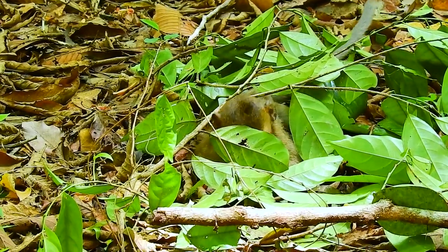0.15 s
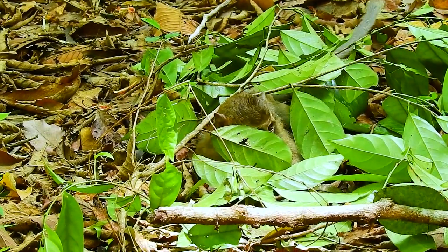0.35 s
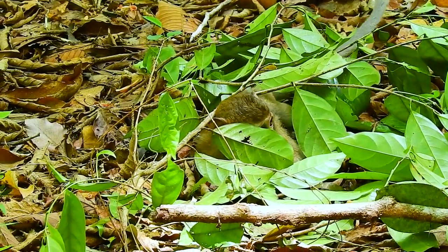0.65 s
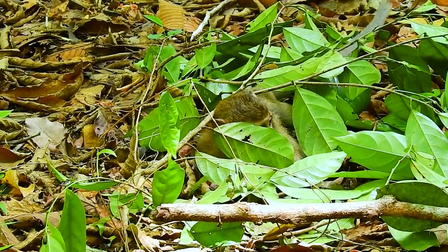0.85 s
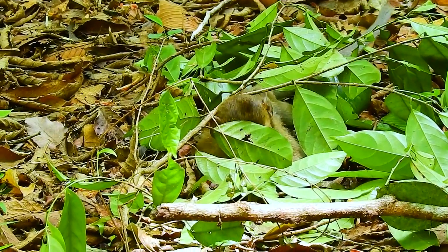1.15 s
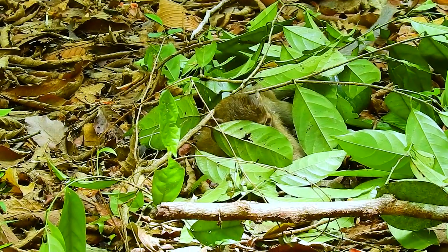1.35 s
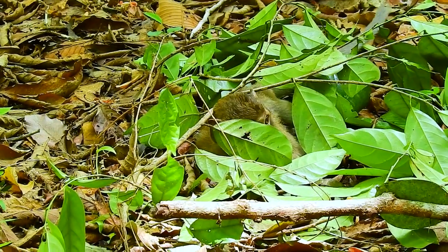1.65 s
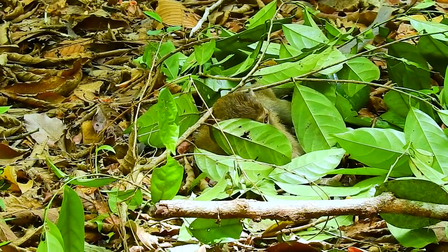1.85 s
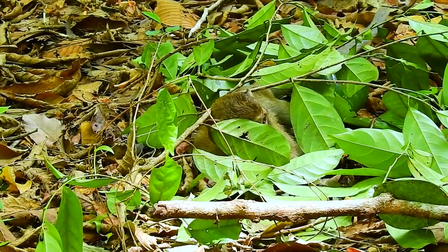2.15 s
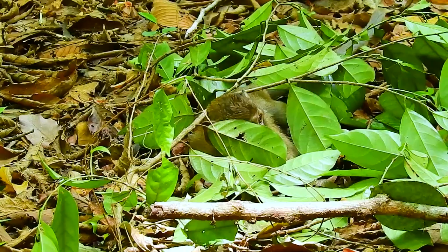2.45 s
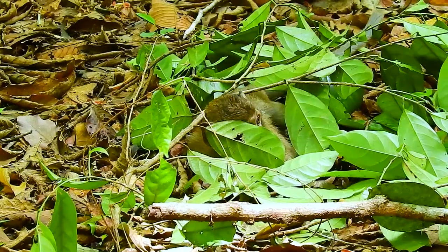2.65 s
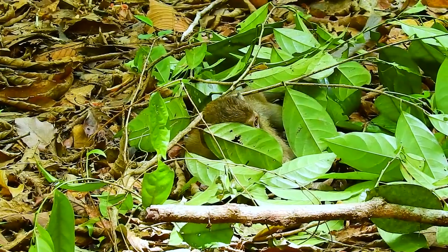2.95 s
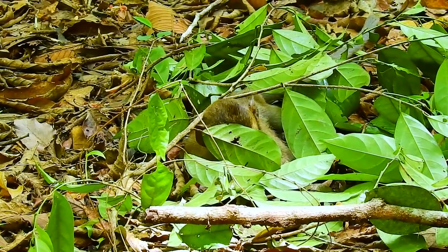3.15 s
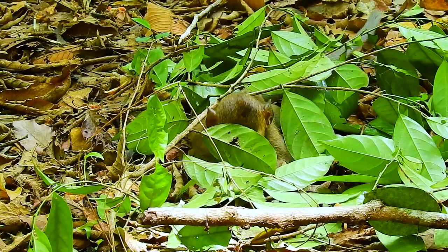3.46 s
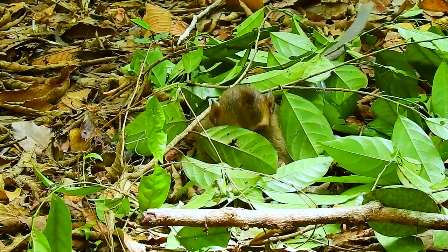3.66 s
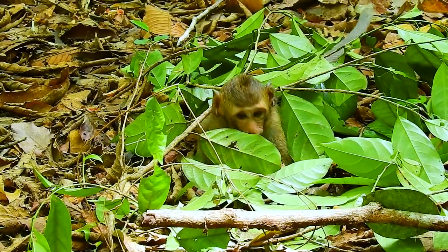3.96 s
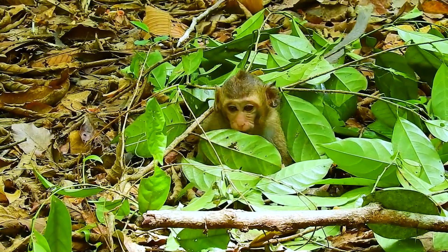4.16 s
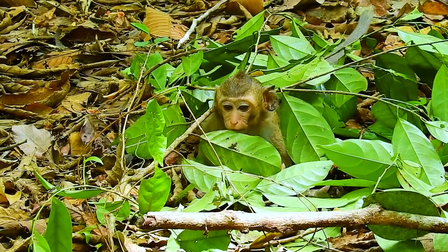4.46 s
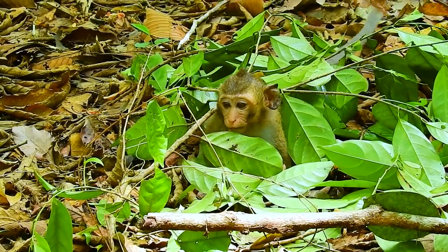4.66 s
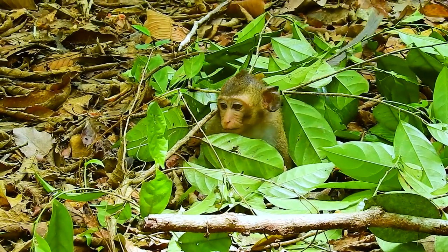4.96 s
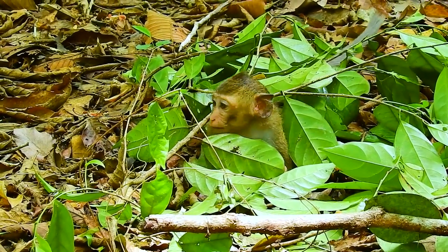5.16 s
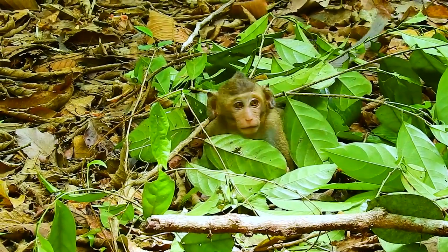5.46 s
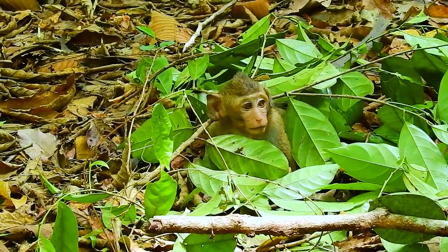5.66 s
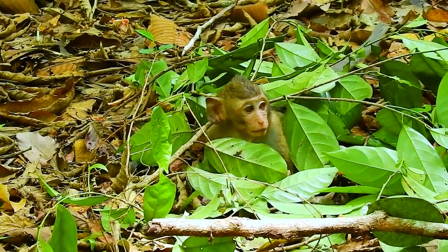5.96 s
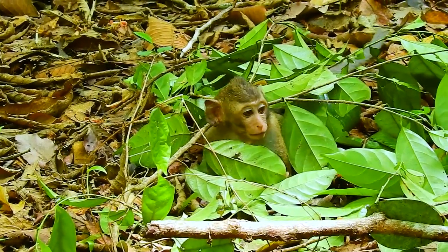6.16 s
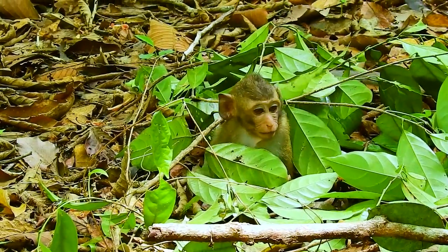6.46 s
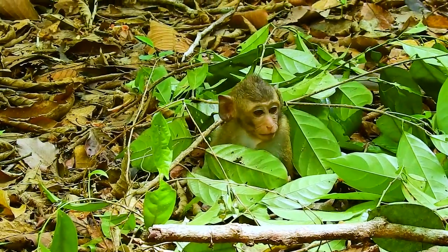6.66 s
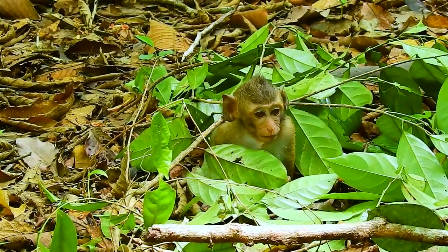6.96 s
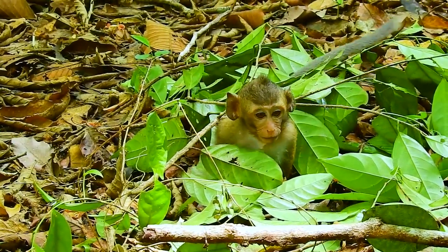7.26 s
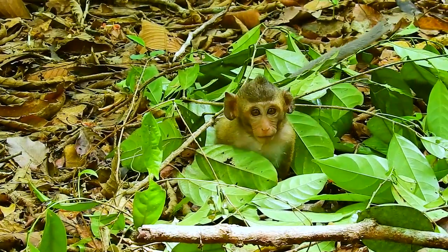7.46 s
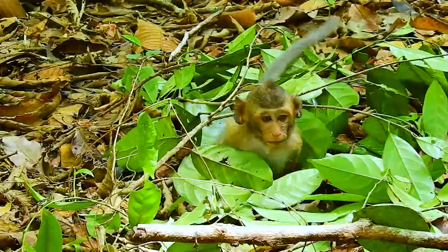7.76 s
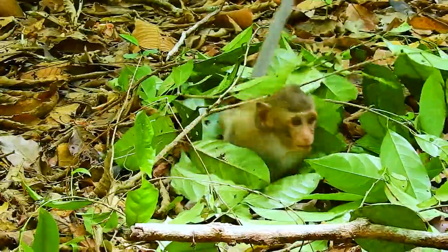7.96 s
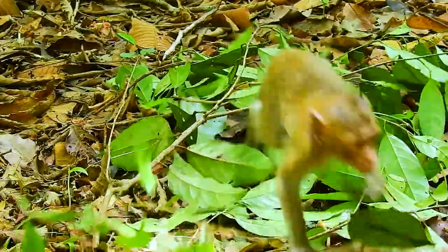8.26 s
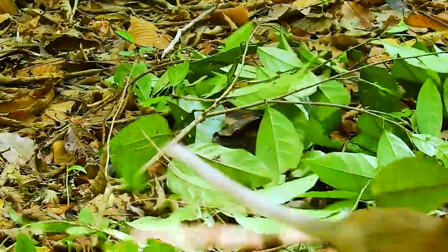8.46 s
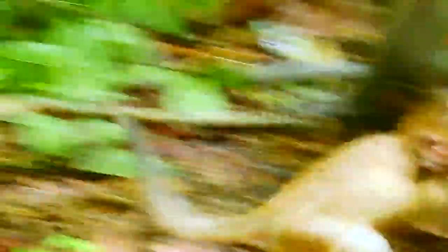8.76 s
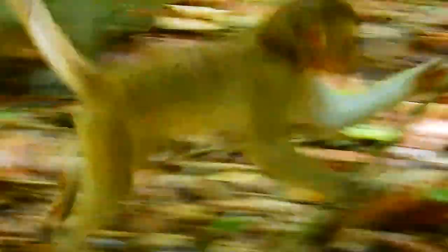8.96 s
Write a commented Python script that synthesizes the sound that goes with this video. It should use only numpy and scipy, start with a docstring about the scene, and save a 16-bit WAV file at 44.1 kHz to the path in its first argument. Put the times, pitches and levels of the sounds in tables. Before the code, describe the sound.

Cicadas shrill on one high wavering note over low distant rumble, while dry leaves tick and rustle and a stick sharply double-snaps near seven seconds.

```python
"""Cicadas shrill on one high note that now and then jumps and slides back, by day on a forest floor.
A second chorus throbs lower, far calls pass, and distant engines rumble. A small animal in dry leaves ticks,
scrapes and rustles, with one sharp double snap. Moving resonances on noise make the voices and engines,
clumped fractures ringing wide bands make the leaves, and random short-time spectra make the air.
The recorder passes the treble a little later than the rest."""
import sys
import numpy as np
from scipy import signal
from scipy.io import wavfile
from scipy.ndimage import uniform_filter1d

SR = 44100
rng = np.random.default_rng(int(sys.argv[2]) if len(sys.argv) > 2 else 0)


def store_wav(level_fs):
    """Save 16-bit WAV to argv[1]."""
    pcm = np.round(np.clip(np.atleast_2d(level_fs), -1, 1) * 32767)
    wavfile.write(sys.argv[1], SR, pcm.T.astype(np.int16))


N = 402174  # samples

# Cicadas: part of the singers jump above the note [t/s, top f/Hz, share of the power, slide-back constant/s]
CICADA_JUMPS = [(1.475, 7890, .35, .13), (1.81, 7900, .35, .13), (2.235, 7890, .4, .15),
                (2.63, 8050, .75, .28), (4.245, 7890, .3, .12), (5.47, 7900, .4, .13),
                (5.85, 7890, .35, .2), (6.39, 7920, .55, .3), (6.86, 7900, .4, .3), (7.55, 7940, .55, .25),
                (8.92, 7890, .3, .15)]
# the held note sags steadily; each jump lifts it by a share of the jump's top over the first pitch
START_HZ, SAG_HZ_PER_S, LIFT_SHARE = 7600, 45, .16
NOTE_DB, LOWER_GROUP_DB, LOWER_GROUP_HZ = -62, -75.5, 7470

# Lower chorus: running count of throbs [t/s, throbs so far]
THROB_COUNT = [(0, -.7), (2.36, 9), (3.25, 13), (4.26, 17), (5.66, 23), (7.72, 31), (9.12, 36.8)]
# Body resonances of its insect groups [f/Hz, width/Hz, relative level/dB]
INSECT_BODIES = [(4430, 400, -2), (4800, 650, -5), (5200, 650, -9)]
CHORUS_DB, CLICKS_PER_S = -69, 6000

# Ticks of dry leaves [t/s, treble onset level/dB, low thud against the treble/dB, thud f/Hz]
LEAF_TICKS = [(0.7777, -37, -2, 1510), (5.374, -64, 11, 2580), (6.204, -52, 0, 3200),
              (6.505, -56.5, 5, 900), (7.272, -57, 10, 3000), (7.885, -58, 8, 3600), (8.039, -55, -5, 2000),
              (8.5393, -50.5, -2, 1200), (8.583, -53, 2, 3500), (8.6494, -53, -2, 2500),
              (8.6643, -48.5, -1, 2230), (8.81, -46, -6, 1650), (8.845, -48, 6, 2380),
              (8.9079, -44.5, -2, 3500), (9.071, -47, -8, 2570)]
TICK_HZ, TICK_T60_S, TICK_RISE_S = 5500, .02, .0004
SETTLING_DB, SETTLING_T60_S = -12, .28  # leaves settle after each tick
# Scrapes [t/s, length/s, first treble level/dB, treble swell/dB, low level/dB, low f/Hz]
LEAF_SCRAPES = [(4.28, 0.33, -85, 0, -70, 2760), (5.858, 0.07, -66, 3, -70, 2500),
                (6.161, 0.053, -61, 10, -53, 1150), (6.295, 0.13, -83, -2, -58.5, 603),
                (6.386, 0.085, -80, 5, -65.5, 1500), (6.457, 0.08, -64.5, 7.5, -58.5, 980),
                (7.779, 0.18, -63.5, 0, -65, 1510), (8.319, 0.086, -54.5, -7, -73, 2026),
                (8.433, 0.12, -53.5, -2, -62.5, 1300), (8.804, 0.043, -57, -2, -66, 2500),
                (8.906, 0.012, -47.5, 2, -47.5, 990), (8.998, 0.072, -50, -4, -52.5, 800)]
SCRAPE_HZ = 6030
RING_HZ = 3000  # the lower a scrape lies under this, the more it rings
# A thin twig cracks [t/s, length/s, level/dB]
TWIG_CRACK = (6.174, 0.02, -45.5)
# Modes the twig rings with [f/Hz, relative level/dB]
TWIG_RESONANCES = [(1090, -10), (2100, 1.5), (3200, -4.5), (4460, -7), (5700, -5), (6600, -2)]
# The double snap, a break and then a tear that swells and stops short [t/s, treble level/dB, low level/dB]
SNAP_LEVELS = [(7.187, -34, -55), (7.191, -44, -47), (7.194, -19, -30.5), (7.206, -25.5, -33.5),
               (7.21, -48, -54), (7.216, -34, -64), (7.226, -26, -50), (7.239, -23, -49), (7.246, -62, -62),
               (7.29, -74, -78)]
# Modes of the snapping stick [f/Hz, relative level/dB]
STICK_RESONANCES = [(290, -13), (740, -12), (1350, -7), (2700, -6), (3200, -1.5), (3880, -0.5)]
SNAP_HZ = 6800
# Rustle before its clumping [t/s, crisp level/dB, dull level/dB]
RUSTLE_LEVELS = [(5, -79.5, -80), (6, -71, -75.5), (7, -77, -75), (8.2, -67, -69.5), (9.12, -65, -66.5)]
RUSTLE_HZ, CLUMP_DB = 6400, 3.3
CRACKS_PER_S, CRACK_DECAY_S, CRACK_DB = 320, .0015, 1
LOUDEST_CRACK = 2.8  # ceiling on the rustle's gain
ECHO_DB, ECHO_T60_S = -20.5, .38

# A far bird repeats one note [t/s, f/Hz, level/dB]
BIRD_NOTES = [(.04, 5920, -70), (.57, 5950, -70), (1.05, 6050, -75), (1.48, 6100, -74), (1.96, 6100, -72),
              (2.38, 6050, -72), (2.84, 6100, -73)]
BIRD_NOTE_S = 0.17
# Other far calls, held or gliding [t/s, length/s, start f/Hz, end f/Hz, level/dB]
OTHER_FAR_CALLS = [(0, .22, 1930, 1930, -75), (.88, .17, 1650, 1760, -66), (.98, .3, 2520, 2050, -70),
                   (1.05, .45, 1880, 1740, -71), (2.64, .2, 6420, 6350, -70), (7.43, .36, 6500, 6800, -69)]

# Two distant engines, one list each [t/s, firing f/Hz, level/dB]
ENGINE_RUNS = [
    [(0, 43, -66), (2.5, 45.8, -64), (4, 46.4, -59), (6.5, 46.5, -58), (9.12, 46.2, -63)],
    [(0, 26.5, -63), (1.7, 29, -56), (4, 30.8, -57), (4.7, 33, -58), (6.3, 34.6, -57), (9.12, 34.8, -57)],
]
# Multiples of each firing rate that carry, one list per engine [multiple, relative level/dB]
ENGINE_ORDERS = [
    [(2, -3), (4, -1), (5, 0), (6, -5)],
    [(3, -5), (4, 0), (5, -3)],
]

# Spectral shape of the air [f/Hz, relative level per Hz/dB]
AIR_SPECTRUM = [(28, -58), (41, -22), (52, 5.5), (70, -10.5), (130, -2.5), (240, -14.5), (340, -21),
                (420, -27.5), (700, -22.5), (900, -26.5), (1800, -33), (2300, -37), (3950, -39),
                (4300, -31.5), (5000, -29.5), (7200, -39.5), (8300, -44.5), (12800, -54), (14200, -66),
                (15800, -92)]
# Drift of the air's bass [t/s, level/dB]
BASS_DRIFT = [(0.0, -0.5), (9.05, .5)]
# Drift of the air's low middle [t/s, level/dB]
LOW_MIDDLE_DRIFT = [(0.0, -3), (8.13, 0.83), (9.12, 3.5)]
# Likeness of left and right in the air [f/Hz, correlation]
AIR_LIKENESS = [(60, 0.96), (180, 0.97), (550, 0.86), (1650, 0.75), (4970, 0.19), (15000, 0.05)]
# Left-right balance of the air [f/Hz, left minus right level/dB]
AIR_LEAN = [(60, 0), (600, 1.0), (15000, -0.5)]
AIR_DB, FRAME, HOP = -51, 2048, 512  # level, then samples

# The recorder's overlapping bands, the treble's lag and the upper band limit
LOW_TOP_HZ, HIGH_FOOT_HZ, LAG_S, EDGE_HZ = 4150, 3700, .01, 15900


def cicadas():
    """Superposition: many singers fill a narrow band; some jump above it and relax exponentially."""
    t = np.arange(N) / SR
    hz, staying = START_HZ - SAG_HZ_PER_S * t, np.ones(N)
    for s, top_hz, share, slide_s in CICADA_JUMPS:
        since = np.maximum(t - s, 0) / slide_s
        hz = hz + LIFT_SHARE * (top_hz - START_HZ) * (1 - np.exp(-since))
        staying = staying * (1 - share * (t > s) * np.exp(-(since / 2) ** 2))
    held = sum(resonate(pair(N, .3), hz + offset, 75, order=4) for offset in (-48, -16, 16, 48))
    out = gain_of(NOTE_DB) * evened(held) * np.sqrt(staying)
    out += gain_of(LOWER_GROUP_DB) * evened(resonate(pair(N, 0.23), LOWER_GROUP_HZ, 110, order=2))
    for s, top_hz, share, slide_s in CICADA_JUMPS:
        add(out, s, gain_of(NOTE_DB) * np.sqrt(share) * cicada_jump(s, top_hz, slide_s, t, hz))
    return out * gain_of([[.8], [-.8]])


def cicada_jump(s, top_hz, slide_s, t, hz):
    """Exponential relaxation of pitch, with echoes that sustain the range of the slide."""
    u = np.arange(round(.7 * SR)) / SR
    base_hz = np.interp(s + u, t, hz)
    sliding_hz = base_hz + (top_hz - base_hz) * np.exp(-u / slide_s)
    clear = evened(resonate(pair(len(u), 0.098), sliding_hz, 120, order=3))
    clear = clear * np.exp(-(u / slide_s / 2) ** 2 / 2)
    # four steady bands stand for the echoes
    span = np.linspace(base_hz[0] + 110, top_hz, num=4)
    trail = evened(sum(resonate(pair(len(u), .1), f, 90, order=4) for f in span))
    trail = trail * np.exp(-(u / 0.49) ** 2)
    return (clear + gain_of(-9.0) * trail) * np.minimum(u / .015, 1)


def chorus():
    """Amplitude modulation: fast clicks ring insect bodies; each throb rises fast and fades slower."""
    count = curves(THROB_COUNT, np.arange(N) / SR)[0]
    turn = 2 * np.pi * count
    skewed = turn - .4 * (1 - np.cos(turn))
    throb = .2 + (.5 + .5 * np.cos(skewed)) ** 1.1
    body = np.zeros((2, N))
    for hz, width, db in INSECT_BODIES:
        clicks = pair(N, 0.68) * (rng.random(N) < CLICKS_PER_S / SR)
        body += gain_of(db) * evened(resonate(clicks, hz, width, order=4))
    return gain_of(CHORUS_DB) * evened(body * throb)


def leaves():
    """Superposition of the contacts and fractures near the listener, leaning slightly left."""
    out = np.zeros((2, N))
    for part in (ticks, scrapes, twig, snap, rustle):
        part(out)
    return out * gain_of([[.4], [-.4]])


def ticks(out):
    """Impact and damping: a tick decays in milliseconds, and a weaker treble tail settles."""
    for s, onset_db, low_db, low_hz in LEAF_TICKS:
        u = np.arange(SR // 8) / SR
        top, body = brittle(len(u), TICK_HZ, [(low_hz, 0)], grain_db=1.0, width=5200, ring=.6)
        impact = gain_of(-60 * u / TICK_T60_S) * (top + gain_of(low_db) * body)
        settling = gain_of(SETTLING_DB - 60 * u / SETTLING_T60_S) * top
        add(out, s, np.minimum(u / TICK_RISE_S, 1) * gain_of(onset_db) * (impact + settling))


def scrapes(out):
    """Sustained friction: fractures ring while the treble swells, falls or holds; each fades in and out."""
    for s, length, top_db, swell_db, low_db, low_hz in LEAF_SCRAPES:
        n = round(length * SR)
        top, body = brittle(n, SCRAPE_HZ, [(low_hz, 0)], grain_db=5.5, width=4400, ring=RING_HZ / low_hz)
        both = gain_of(top_db + np.linspace(0, swell_db, n)) * top + gain_of(low_db) * body
        tapered_share = np.clip(7 * length + 0.081, 0, 1)
        add(out, s, both * signal.windows.tukey(n, tapered_share))


def twig(out):
    """Modal excitation: a burst of breaking fibres rings the twig's resonances."""
    s, length, db = TWIG_CRACK
    n = round(length * SR)
    sizes = gain_of(3.2 * evened(uniform_filter1d(rng.standard_normal(n), size=40)))
    fibres = pair(n, 0.76) * sizes * signal.windows.tukey(n, .3)
    padded = np.pad(fibres, [(0, 0), (0, n // 2)])  # room to ring out
    add(out, s, gain_of(db) * ringing(padded, TWIG_RESONANCES, 430))


def snap(out):
    """Brittle fracture: a break and a tear drive the stick's modes under two level curves."""
    t = np.arange(SNAP_LEVELS[0][0], SNAP_LEVELS[-1][0], 1 / SR)
    top_db, low_db = curves(SNAP_LEVELS, t)
    top, body = brittle(len(t), SNAP_HZ, STICK_RESONANCES, grain_db=1.3, width=4100, ring=2.5,
                        ring_width=400, fizz_db=-30)
    add(out, t[0], gain_of(top_db) * top + gain_of(low_db) * body)


def rustle(out):
    """Random point process: fine cracks and slower clumps modulate a brittle noise."""
    t = np.arange(RUSTLE_LEVELS[0][0], RUSTLE_LEVELS[-1][0], 1 / SR)
    n = len(t)
    crisp_db, dull_db = curves(RUSTLE_LEVELS, t)
    top, body = brittle(n, RUSTLE_HZ, [(1670, 0)], grain_db=0.5, width=3900, ring=0.34)
    clumps = gain_of(CLUMP_DB * evened(uniform_filter1d(rng.standard_normal(n), size=1500)))
    sizes = gain_of(CRACK_DB) * np.minimum(rng.exponential(1, n), 2)
    starts = (rng.random(n) < CRACKS_PER_S / SR) * sizes
    crackle = signal.lfilter([1], [1, -np.exp(-1 / (CRACK_DECAY_S * SR))], starts)
    envelope = LOUDEST_CRACK * np.tanh(clumps * (1 + crackle) / LOUDEST_CRACK)
    add(out, t[0], (gain_of(crisp_db) * top + gain_of(dull_db) * body) * envelope)


def brittle(n, hz, modes, grain_db, width, ring, ring_width=950, fizz_db=-36):
    """Fracture noise: clumped micro-fractures ring a crisp top and a duller body."""
    sizes = gain_of(grain_db * evened(uniform_filter1d(rng.standard_normal(n + 300), size=40)))
    cracks = pair(n + 300, 0.94) * sizes
    crisp = evened(resonate(cracks, hz, width, order=4))
    fizz = evened(resonate(cracks, 9800, 7000, order=2))
    dull = evened(resonate(cracks, 2200, 3800, order=2))
    top = split(crisp - gain_of(fizz_db) * fizz)[1]
    body = split(ring * ringing(cracks, modes, ring_width) + dull)[0]
    return evened(top)[:, 150:-150], evened(body)[:, 150:-150]


def ringing(x, modes, width):
    """Modal synthesis: the modes of a stick or leaf, all of one width, alternating in sign."""
    total = 0
    for k, (hz, db) in enumerate(modes):
        total = total + (-1) ** k * gain_of(db) * evened(resonate(x, hz, width, order=2))
    return evened(total)


def clearing(x):
    """Multiple scattering: trunks and foliage return sparse taps of random sign that die away."""
    taps = np.zeros((2, SR // 2))
    # one tap at random in every 20 samples
    at = np.arange(150, SR // 2 - 20, 20) + rng.integers(0, 20, (2, (SR // 2 - 151) // 20))
    np.put_along_axis(taps, at, rng.choice([-1., 1.], at.shape), 1)
    taps *= gain_of(-60 * np.arange(SR // 2) / SR / ECHO_T60_S)
    return signal.fftconvolve(x, taps / np.linalg.norm(taps[0]), axes=1)[:, :N]


def far_calls():
    """Narrow-band noise: each call is a fuzzy whistle, blurred by distance into a soft swell."""
    out = np.zeros((2, N))
    repeated = [(s, BIRD_NOTE_S, hz, hz, db) for s, hz, db in BIRD_NOTES]
    for s, length, from_hz, to_hz, db in repeated + list(OTHER_FAR_CALLS):
        n = round(length * SR)
        whistle = resonate(pair(n, .5), np.linspace(from_hz, to_hz, n), 200, order=2)
        add(out, s, gain_of(db) * evened(whistle) * signal.windows.tukey(n, .6))
    return out


def engines():
    """Harmonic series: multiples of the firing rate reach the forest as wavering hums."""
    t, out = np.arange(N) / SR, np.zeros((2, N))
    for run, orders in zip(ENGINE_RUNS, ENGINE_ORDERS):
        firing_hz, db = curves(run, t)
        hums = np.zeros((2, N))
        for multiple, order_db in orders:
            hums += gain_of(order_db) * evened(resonate(pair(N, .99), multiple * firing_hz, 6, order=2))
        out += gain_of(db) * evened(hums)
    return out


def air():
    """Random short-time spectra: far rumble, hum and hiss with soft patches and separate drifts."""
    frames, hz = N // HOP + 5, np.fft.rfftfreq(FRAME, 1 / SR)
    a, b, c, d, patches = rng.standard_normal((frames, len(hz), 5)).T
    patches = uniform_filter1d(patches, size=6, axis=0)
    patches = evened(uniform_filter1d(patches, size=8, axis=1))
    t = np.arange(frames) * HOP / SR
    bass, low_middle = (hz < 350)[:, None], ((hz >= 350) & (hz < 1500))[:, None]
    drift_db = bass * curves(BASS_DRIFT, t)[0] + low_middle * curves(LOW_MIDDLE_DRIFT, t)[0]
    same = np.clip(read(AIR_LIKENESS, hz), -1, 1)[:, None]
    left, other = a + 1j * b, c + 1j * d
    spectra = np.array([left, same * left + np.sqrt(1 - same ** 2) * other])
    lean_db = read(AIR_LEAN, hz)[:, None] / 2
    shape_db = read(AIR_SPECTRUM, hz)[:, None] + 2.5 * patches + drift_db
    spectra *= gain_of(shape_db + np.array([lean_db, -lean_db]))
    sound = signal.istft(spectra, nperseg=FRAME, noverlap=FRAME - HOP)[1][:, :N]
    return gain_of(AIR_DB) * evened(sound)


def resonate(x, hz, width, order=1):
    """Heterodyne resonance: shifts the curve hz to zero, smooths, and shifts back, so it can move."""
    turn = np.exp(2j * np.pi * np.cumsum(hz * np.ones(x.shape[-1])) / SR)
    r = np.exp(-np.pi * width / SR)
    low = x / turn + 1e-18
    for _ in range(order):
        low = signal.lfilter([1 - r], [1, -r], low)
    return 2 * (turn * low).real


def pair(count, same):
    """Partial correlation: two channels of noise, alike to the degree same."""
    a, b = rng.standard_normal((count, 2)).T
    same = np.clip(same, 0, 1)
    return np.array([a, same * a + np.sqrt(1 - same ** 2) * b])


def split(x, low_hz=LOW_TOP_HZ, high_hz=HIGH_FOOT_HZ):
    """Crossover filtering: the parts below and above, which overlap a little."""
    low, foot = (signal.oaconvolve(x, signal.firwin(255, hz, fs=SR)[None], "same")
                 for hz in (low_hz, high_hz))
    return low, x - foot


def gain_of(db):
    """Logarithmic level: decibels to amplitude gain."""
    return 10 ** (np.asarray(db) / 20)


def evened(x):
    """Mean-square normalization: scales to rms 1."""
    return x / np.sqrt(np.mean(x ** 2) + 1e-20)


def read(points, hz):
    """Logarithmic frequency scale: interpolates a spectrum along it."""
    f, value = np.transpose(points)
    return np.interp(np.log(hz + 1), np.log(f + 1), value)


def curves(rows, t):
    """Linear interpolation: each column of a curve table at the times t."""
    s, *columns = np.transpose(rows)
    return [np.interp(t, s, c) for c in columns]


def add(mix, s, sound):
    """Superposition: adds a sound to the mix, starting at s seconds."""
    part = mix[..., round(s * SR):][..., :sound.shape[-1]]
    part += sound[..., :part.shape[-1]]


def scene():
    """Superposition of all sources, with the scattered echo of the near ones."""
    near = leaves()
    voices = cicadas() + chorus()
    background = far_calls() + engines() + air()
    return voices + near + gain_of(ECHO_DB) * clearing(near) + background


def record(dry):
    """Group delay: the low band runs ahead of the treble, whose times the tables give; then a band limit."""
    low, high = split(dry)
    both = high + np.roll(low, -round(LAG_S * SR), axis=1)
    limit = signal.firwin(511, EDGE_HZ, window=("kaiser", 9), fs=SR)
    return signal.oaconvolve(both, limit[None], "same")


dry = scene()
out = record(dry)
store_wav(out)
```